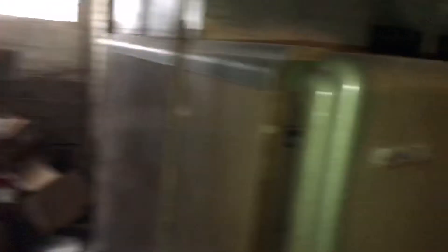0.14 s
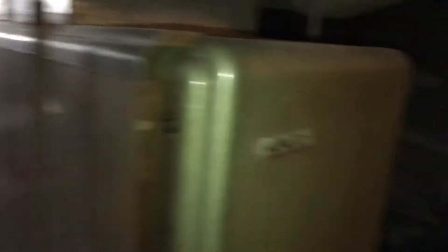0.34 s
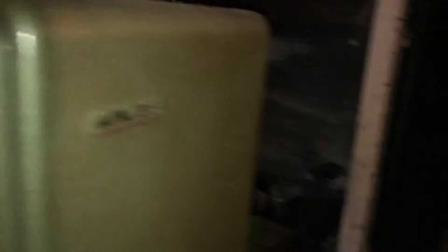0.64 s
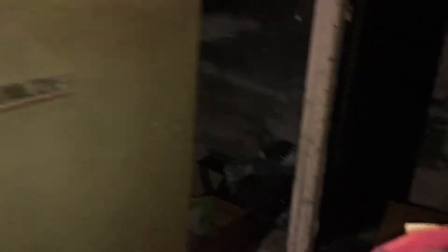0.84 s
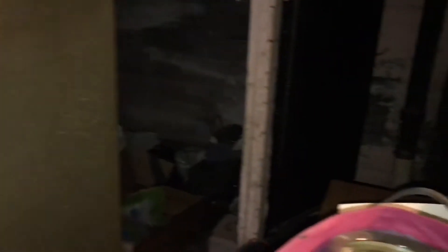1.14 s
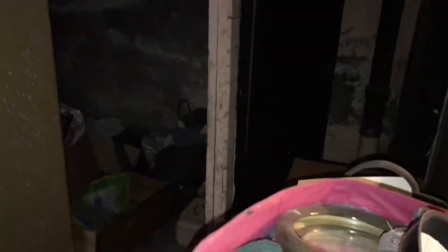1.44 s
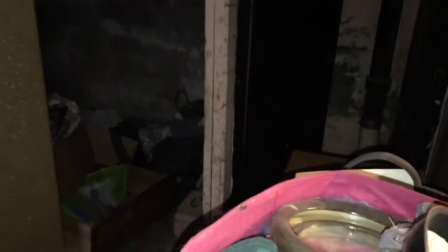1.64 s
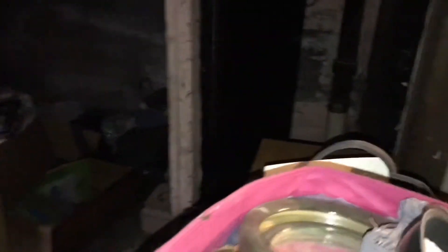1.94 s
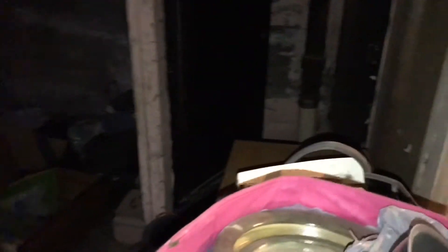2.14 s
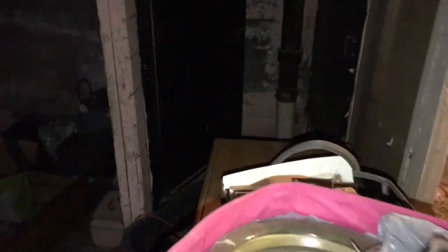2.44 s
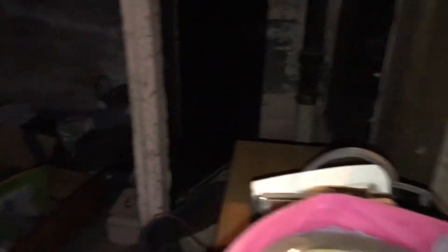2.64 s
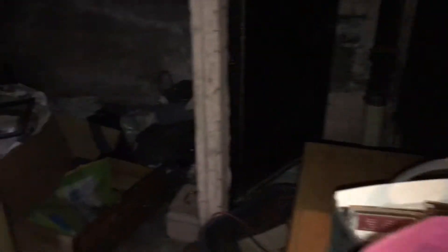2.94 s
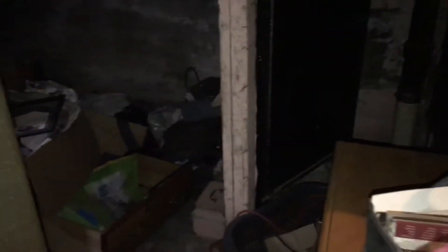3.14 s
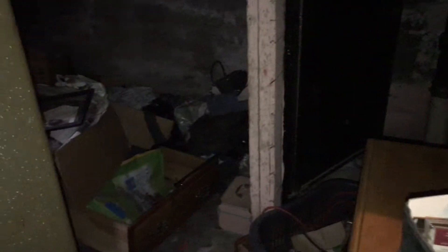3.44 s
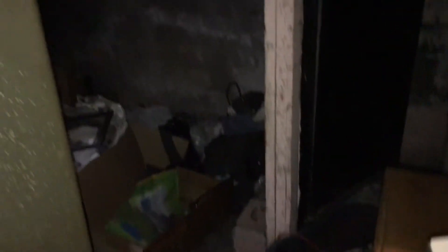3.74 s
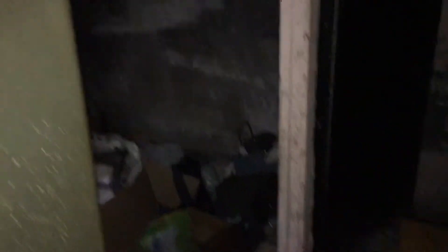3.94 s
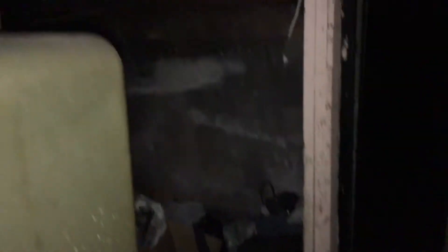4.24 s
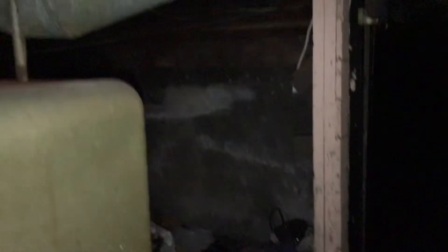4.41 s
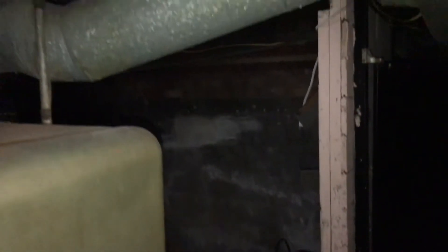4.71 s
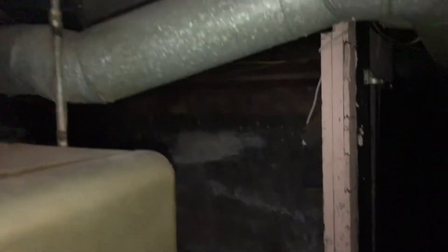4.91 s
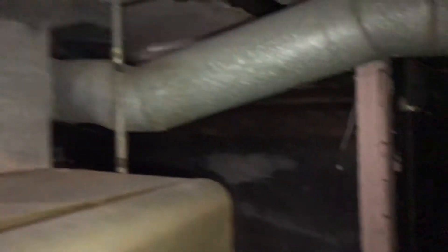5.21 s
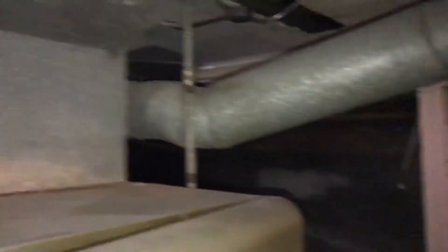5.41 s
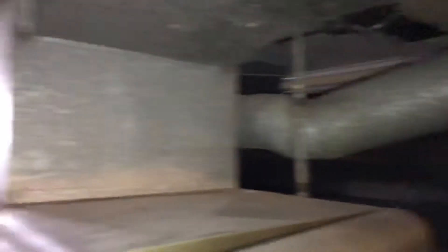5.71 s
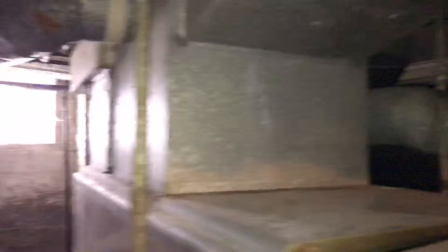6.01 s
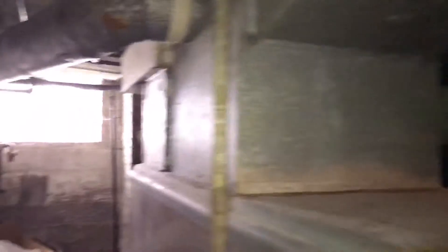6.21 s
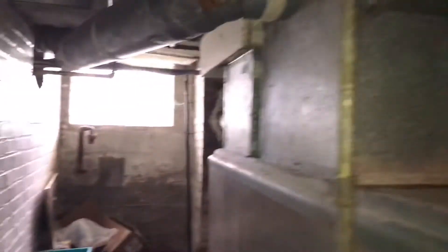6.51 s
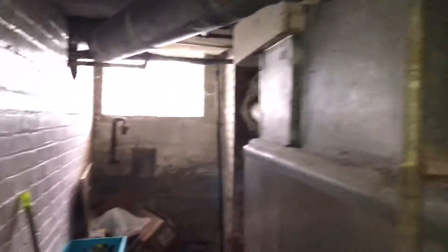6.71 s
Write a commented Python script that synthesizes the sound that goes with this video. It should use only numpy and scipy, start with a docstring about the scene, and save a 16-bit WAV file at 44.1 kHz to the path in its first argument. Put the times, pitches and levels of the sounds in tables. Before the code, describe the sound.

Steady low rumble and hum of a basement furnace blower, with airy duct hiss and a few soft shoe scuffs.

```python
"""A low, throbbing hum, close beside a belt-driven furnace blower in a low brick basement.
Each lap of the belt shakes the casing; the motor buzzes, the burner rumbles, air rushes in the ducts
with a thin hiss and faint whistles. The microphone turns slowly, drifting away from the cabinet
and back. Now and then the shoes and clothing of the person turning scuff softly."""
import sys
import numpy as np
from scipy import signal
from scipy.fft import rfft, irfft, next_fast_len
from scipy.io import wavfile
from scipy.ndimage import map_coordinates

SR = 44100
rng = np.random.default_rng(int(sys.argv[2]) if len(sys.argv) > 2 else 0)


def master(y):
    """Save y as 16-bit WAV."""
    cut = np.clip(np.atleast_2d(y).T, -1, 1)
    pcm = np.round(cut * 32767)  # scale
    wavfile.write(sys.argv[1], SR, pcm.astype(np.int16))


N = 302526

BELT_HZ, WHEEL_HZ, MAINS_HZ = 7.366, 11.342, 60
SHAFT_TURNS_PER_LAP, FIRST_THROB_S = 4, .13

# casing vibration, before microphone position: (order [multiple of the lap rate], level [dB])
CASING_ORDERS = [(5, -60), (8, -43), (9, -61), (10, -46), (11, -48), (12, -44), (13, -38), (14, -51),
                 (15, -57), (16, -57), (18, -53), (19, -46), (20, -53), (22, -56), (23, -54), (24, -42),
                 (27, -60), (29, -58), (30, -59), (31, -55), (32, -51), (36, -59), (40, -59)]
# standing-wave peaks on the microphone's path: (order [lap multiple], time [s], half-width [s], lift [dB])
ANTINODE_PASSES = [(23, 0.11, 1, 12.5), (32, 1.5, 1.24, 6.5), (24, 4.98, 1.09, 7.5), (32, 5.42, 0.32, 8.5),
                   (29, 5.35, 0.47, 9.5), (23, 5.3, 1.3, 5.5)]
# motor buzz, before distance: (offset from twice the mains rate [shaft rates], level [dB])
BUZZ_SIDEBANDS = [(-2, -50.5), (0, -44.5), (1, -54.5)]
# blower wheel, before distance: (order [multiple of its turning rate], level [dB])
WHEEL_ORDERS = [(5, -57), (6, -56), (8, -45)]
# flame, duct drone, rushing air and hiss: (frequency [Hz], relative density [dB])
BURNER_SPECTRUM = [(15, -46), (27, -24), (34, -32), (42, 8.5), (55, -5.5), (90, 8), (130, -4.5), (190, -36),
                   (260, -38), (500, -55)]
DRONE_SPECTRUM = [(100, -45), (160, 5.5), (210, -1.5), (290, -0.5), (345, -5), (420, -18.5), (700, -21.5),
                  (1500, -102)]
AIR_SPECTRUM = [(150, -39), (330, 1), (430, 0.5), (700, -0.5), (950, -3.5), (1200, -6.5), (1500, -6.5),
                (1800, -10.5), (2100, -16), (2800, -25), (5000, -45), (16000, -88)]
HISS_SPECTRUM = [(1000, -30), (2200, 1), (3000, 1), (4100, 2), (4900, -6), (5900, -4), (6700, -2.5),
                 (7700, -8.5), (8800, -9), (10000, -13.5), (12000, -13.5), (16000, -16.5)]
# microphone aim, high when it points at the furnace: (time [s], relative level [dB])
MIC_AIM = [(0.0, -60), (1.95, -67), (3.25, -66.5), (5.16, -65), (6.32, -60), (6.86, -61.5)]
# duct and grille resonances: (frequency [Hz], width [Hz], mid level [dB], time at loudest spot [s])
DUCT_RESONANCES = [(425, 30, -63.5, 6.6), (699, 11, -66.5, 2.4), (815, 14, -71, 2.4), (1534, 6, -74.5, .6),
                   (2366, 75, -71, 6.2), (3243, 150, -72.6, 6.7), (3975, 80, -84, 3), (6400, 220, -84, .3),
                   (7236, 120, -83.5, .2)]
# shoes on the floor: (time [s], length [s], ring [Hz], ring [dB], scrape [dB], grit [dB], fizz [dB])
SHOE_SCUFFS = [(0.924, 0.074, 1880, -50, -58, -61, -71), (1.370, 0.038, 726, -51, -47, -78, -85),
               (1.763, 0.062, 1750, -55, -54.5, -59, -67), (5.867, 0.046, 2130, -57, -51, -61, -71),
               (6.141, 0.062, 3660, -58.5, -64, -59.5, -75), (6.323, .06, 1090, -47, -52.5, -64, -82)]
# clothing rubs: (time [s], length [s], fizz level [dB])
CLOTH_RUBS = [(0.166, 0.0079, -59.5), (0.4, 0.074, -70.5), (0.488, 0.21, -73.5), (1.453, 0.067, -71.5),
              (5.816, 0.076, -70), (6.228, 0.029, -68)]
# middle, upper and top bands of friction: (frequency [Hz], relative density [dB])
SCRAPE_SPECTRUM = [(200, -30), (600, -2.5), (1200, 4), (2100, -4.5), (3200, -8), (6000, -39)]
GRIT_SPECTRUM = [(1200, -30), (2600, -1), (4000, 0), (6500, -1), (9000, -3), (12000, -30)]
FIZZ_SPECTRUM = [(6000, -34), (9000, 1), (12000, 7), (16000, 0)]


def casing(laps, split_hz=145, waver_db=.58):
    """The belt jolts the casing each lap; low orders grow up close, some upper ones stand in the room."""
    hum = np.zeros(N)
    for order, db in CASING_ORDERS:
        order = round(order)
        place_db = closeness_db() if order * BELT_HZ < split_hz else standing_wave_db(order)
        hum += amp(db + place_db + waver_db * wobble(.98)) * partial(order, laps, BELT_HZ)
    return hum


def belt_laps(creep_laps=.0032):
    """Laps the belt has run since its seam hit the pulley; it creeps a little."""
    return BELT_HZ * (clock() - FIRST_THROB_S) + creep_laps * wobble(.93)


def partial(order, turns, rate_hz):
    """One order of a rotation; those in the cabinet's boom line up once a turn, the rest scatter."""
    in_boom = 85 < order * rate_hz < 105
    return np.sqrt(2) * np.sin(2 * np.pi * order * turns) if in_boom else tone(order * turns)


def motor(laps):
    """Magnetic buzz swung by the rotor, and the driven wheel, whose tones beat against the belt's."""
    buzz = sum(amp(db) * tone(2 * MAINS_HZ * clock() + round(side) * SHAFT_TURNS_PER_LAP * laps)
               for side, db in BUZZ_SIDEBANDS)
    turns = WHEEL_HZ * (clock() - FIRST_THROB_S)
    wheel = sum(amp(db) * partial(order, turns, WHEEL_HZ) for order, db in WHEEL_ORDERS)
    return amp(closeness_db()) * (buzz + wheel)


def burner(base_db=-45.5):
    """The flame rumbles inside the cabinet, louder up close."""
    return amp(base_db + closeness_db()) * noise(BURNER_SPECTRUM)


def ducts(laps, drone_db=-46, air_db=-50.5):
    """Air rushes louder facing the furnace, drones louder facing away; shaft and belt flutter both."""
    flutter = .13 * tone(SHAFT_TURNS_PER_LAP * laps) + .19 * tone(laps)
    drone = amp(drone_db - .58 * facing_db()) * (1 + flutter) * noise(DRONE_SPECTRUM)
    air_gain = amp(air_db + .46 * facing_db() + .86 * wobble(12)) * (1 + .3 * flutter)
    return drone + air_gain * duct_echoes(noise(AIR_SPECTRUM))


def duct_echoes(air, echo_gain=.09):
    """Short echoes inside the sheet metal ripple the spectrum."""
    delays_s = rng.uniform(.004, .04, 8)
    return unit(air + echo_gain * sum(np.roll(air, round(s * SR)) for s in delays_s))


def hiss(base_db=-65.5):
    """A thin, even hiss beams forward from the furnace and dims as the microphone turns away."""
    return amp(base_db + .81 * facing_db() + .41 * wobble(9.2)) * noise(HISS_SPECTRUM)


def whistles(waver_db=1.5, swing_db=2.5, beamed_hz=2000):
    """Air sings in narrow resonances, each loudest at one spot on the path; high ones beam forward."""
    out = np.zeros(N)
    for centre_hz, width_hz, db, loudest_s in DUCT_RESONANCES:
        breath = unit(filtered(rng.standard_normal(N), lambda hz: resonance(hz, centre_hz, width_hz) ** 2))
        spot_db = swing_db * np.cos(2 * np.pi * (clock() - loudest_s) * SR / N)
        beam_db = .35 * facing_db() * (centre_hz > beamed_hz)
        out += amp(db + spot_db + beam_db + waver_db * wobble(3.16)) * breath
    return out


def scuffs(grain_db=1.5, ring_width_hz=160, ring_s=.034):
    """Soles catch on the floor in tiny grains; each rings briefly at first contact."""
    scrape, grit, fizz = noise(SCRAPE_SPECTRUM), noise(GRIT_SPECTRUM), noise(FIZZ_SPECTRUM)
    grains = unit(amp(grain_db * wobble(500)))
    out = np.zeros(N)
    for start, length, ring_hz, ring_db, scrape_db, grit_db, fizz_db in SHOE_SCUFFS:
        ring = unit(filtered(rng.standard_normal(N), lambda hz: resonance(hz, ring_hz, ring_width_hz)))
        rub = amp(scrape_db) * scrape + amp(grit_db) * grit + amp(fizz_db) * fizz
        out += stroke(start, length) * grains * rub
        out += stroke(start, ring_s) * amp(ring_db) * ring
    return out


def rustles(grain_db=3.5, gritty_s=.06, grit_db=7):
    """A short flick of cloth is nearly all fizz; a longer rub gains grit."""
    grit, fizz = amp(grit_db) * noise(GRIT_SPECTRUM), noise(FIZZ_SPECTRUM)
    out = np.zeros(N)
    for start, length, db in CLOTH_RUBS:
        rub = fizz + min(length / gritty_s, 1) * grit
        out += amp(db) * stroke(start, length) * rub
    return unit(amp(grain_db * wobble(500))) * out


def basement(x, wet_db=-9, t60_s=.22):
    """The cluttered brick room adds a short tail."""
    t = np.arange(SR // 2) / SR
    tail = rng.standard_normal(len(t)) * amp(-60 * t / t60_s)
    return x + amp(wet_db) * signal.fftconvolve(x, tail / np.linalg.norm(tail))[:N]


def closeness_db(farthest_s=3.39, far_db=-2.5, db_per_s=1.98):
    """Gain of the cabinet's sound as the microphone drifts away and comes back."""
    return far_db + db_per_s * np.abs(clock() - farthest_s)


def facing_db():
    """Gain, about its mean, from pointing the microphone at the furnace."""
    db = np.interp(clock(), *np.transpose(MIC_AIM))
    return db - db.mean()


def standing_wave_db(order, node_db=-3.5):
    """Gain as the microphone crosses an order's antinodes between the walls; 0 if it has none."""
    lifts = [db * np.exp(-((clock() - s) / width) ** 2)
             for k, s, width, db in ANTINODE_PASSES if round(k) == order]
    return node_db + sum(lifts) if lifts else 0


def stroke(start, length, rise=.17):
    """Envelope of one rub: it swells over the share `rise` of its length, then fades."""
    progress = np.maximum(clock() - start, 0) / length
    return np.minimum(progress / rise, 1) * np.exp(-progress ** 3)


def amp(db):
    """Decibels to gain."""
    return 10 ** (np.asarray(db) / 20)


def unit(x):
    """Scale to rms 1."""
    return x / np.sqrt(np.mean(x ** 2) + 1e-20)


def clock():
    """The time of every sample."""
    return np.arange(N) / SR


def wobble(rate):
    """A smooth random curve, rate knots a second."""
    knots = rng.standard_normal(int(N * rate / SR) + 4)
    return map_coordinates(knots, [clock() * rate], mode="nearest")


def filtered(x, response):
    """x shaped by a response of frequency."""
    size = next_fast_len(N + SR // 2)
    return irfft(rfft(x, size) * response(np.fft.rfftfreq(size, 1 / SR)), size)[:N]


def noise(spectrum):
    """Noise of rms 1 with the given spectral shape."""
    knots_hz, db = np.transpose(spectrum)
    shape = lambda hz: amp(np.interp(np.log(hz + 1), np.log(knots_hz), db))
    return unit(filtered(rng.standard_normal(N), shape))


def resonance(hz, centre_hz, width_hz):
    """Response of one damped mode, 1 at its centre."""
    return 1j * hz * width_hz / (centre_hz ** 2 - hz ** 2 + 1j * hz * width_hz)


def tone(cycles):
    """A sine of rms 1 that starts anywhere in its cycle."""
    return np.sqrt(2) * np.sin(2 * np.pi * (cycles + rng.random()))


def scene():
    """The furnace close by, in mono; shoes and clothing carry the basement's tail."""
    laps = belt_laps()
    furnace = casing(laps) + motor(laps) + burner() + ducts(laps) + hiss() + whistles()
    return (furnace + basement(scuffs() + rustles()))[None]


def record(dry, notch_hz=10450, notch_width_hz=700, notch_depth=.38, top_hz=15800):
    """The microphone port has a dip in the treble; nothing passes above top_hz."""
    port = lambda hz: (1 - notch_depth * resonance(hz, notch_hz, notch_width_hz)) * (hz < top_hz)
    return filtered(dry[0], port)[None]


dry = scene()
out = record(dry)
master(out)
```